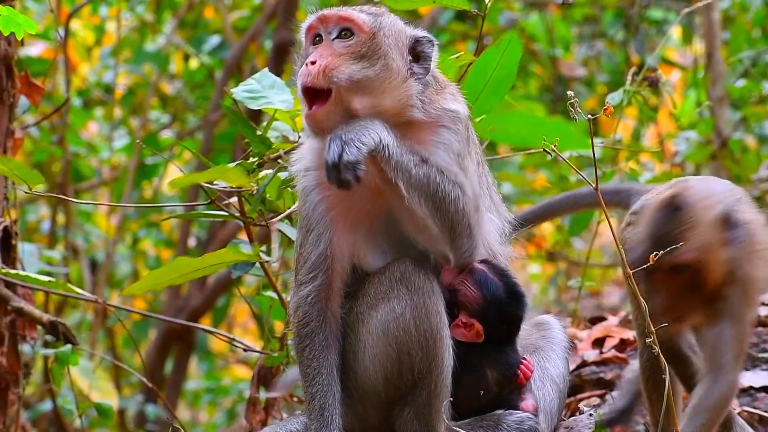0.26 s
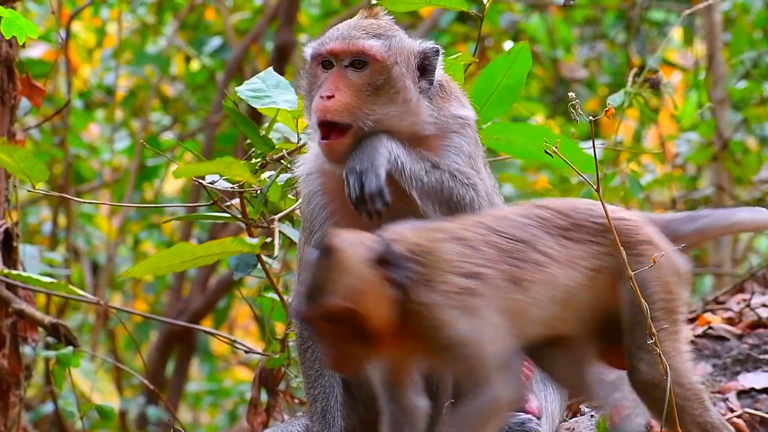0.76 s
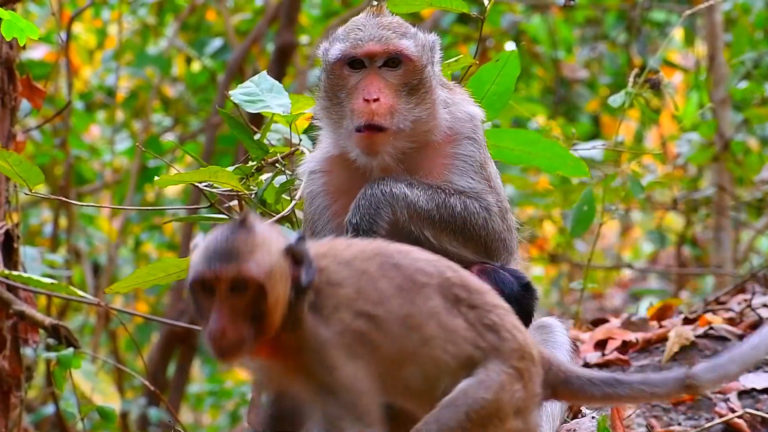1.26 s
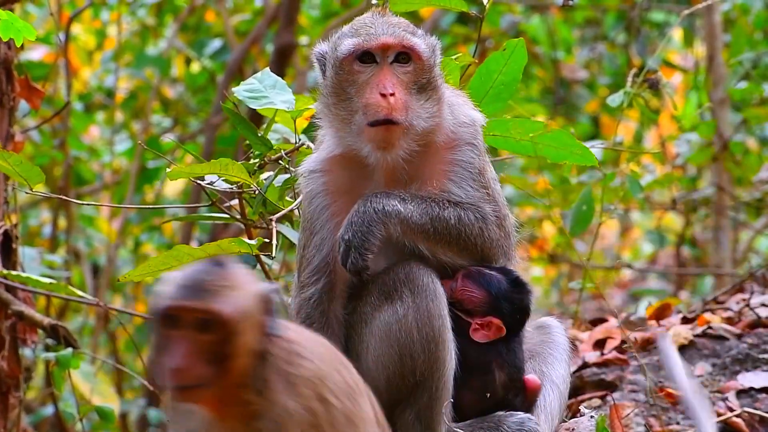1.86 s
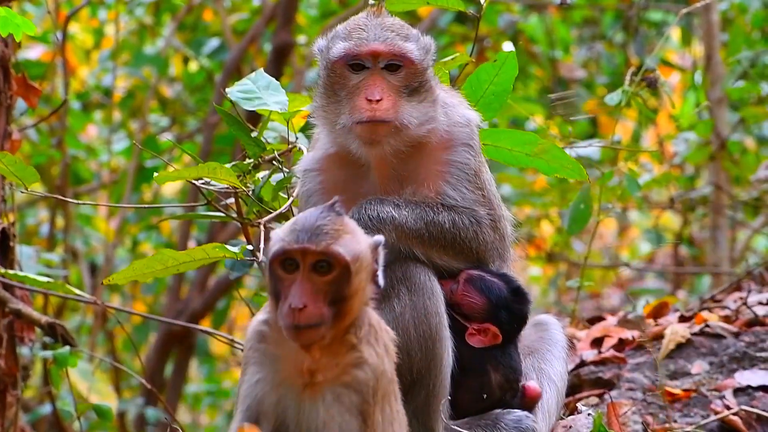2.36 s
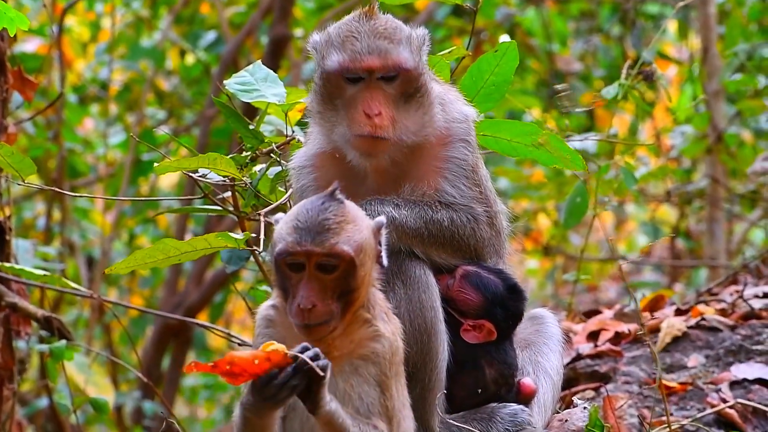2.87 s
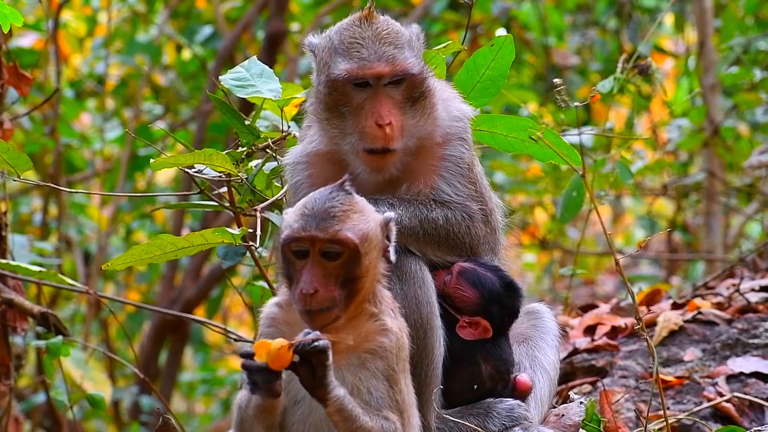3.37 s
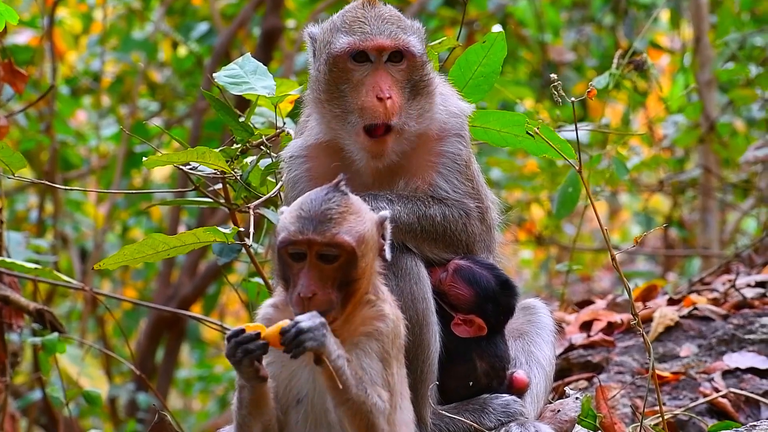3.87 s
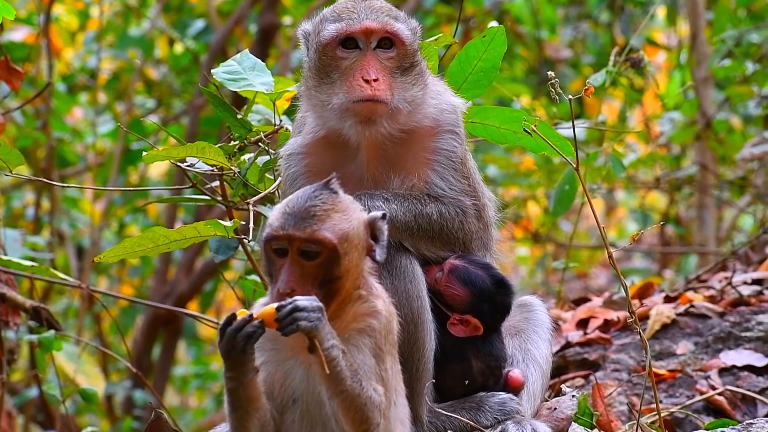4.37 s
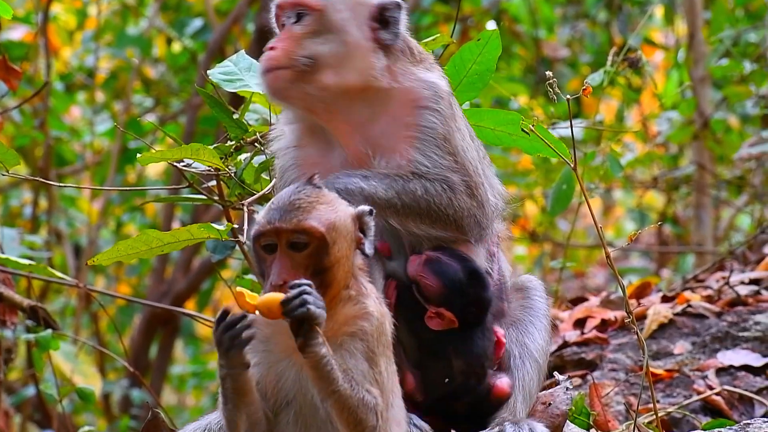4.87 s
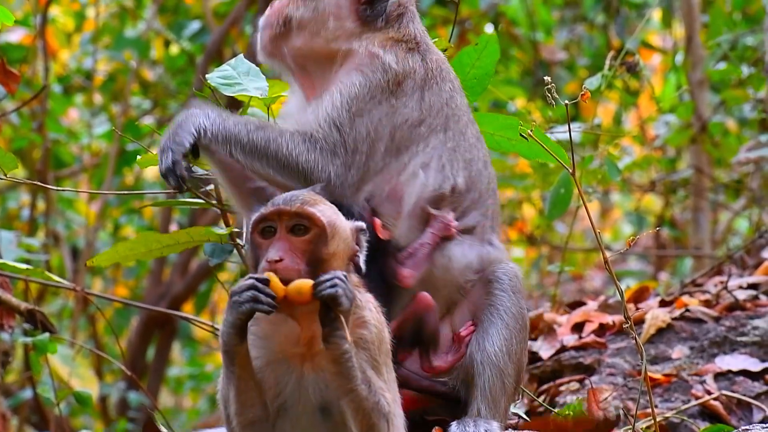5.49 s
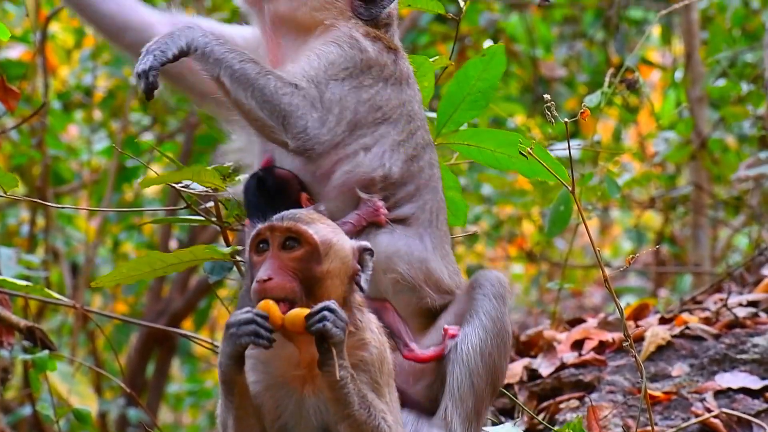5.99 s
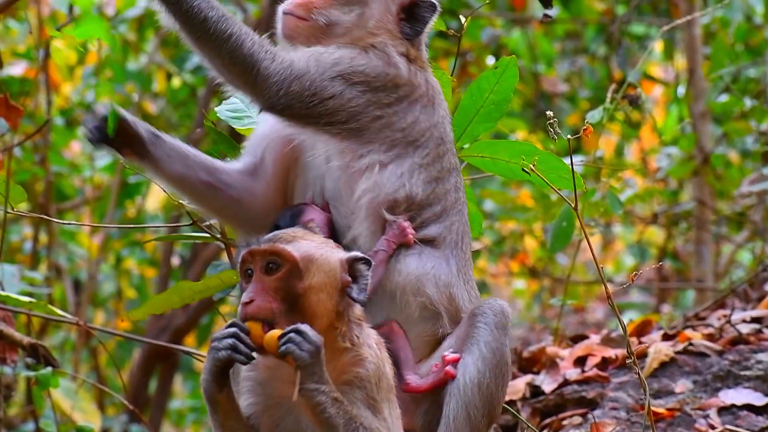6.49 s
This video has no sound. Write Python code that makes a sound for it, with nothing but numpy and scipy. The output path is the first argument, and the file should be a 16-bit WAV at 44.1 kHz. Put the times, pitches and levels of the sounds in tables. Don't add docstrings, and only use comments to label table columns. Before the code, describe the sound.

Shrill monkey squeals and squeaks with rustling leaf litter, snapping twigs and brief coos, fading to a calm forest hush with sparse ticks.

```python
import sys
import numpy as np
from scipy import signal
from scipy.fft import rfft, irfft, next_fast_len
from scipy.io import wavfile
from scipy.ndimage import map_coordinates

SR = 44100
rng = np.random.default_rng(int(sys.argv[2]) if len(sys.argv) > 2 else 0)


def field_ratio(decibels):
    return 10 ** (np.asarray(decibels, dtype=float) / 20)


def unload_wav(signal):
    wavfile.write(
        sys.argv[1],
        SR,
        np.round(np.clip(np.atleast_2d(signal).T, -1, 1) * 32767).astype(np.int16),
    )


N = 297189


def unit(x):
    return x / np.sqrt(np.mean(np.abs(x) ** 2) + 1e-20)


def along(points, hz):
    f, v = np.transpose(points)
    return np.interp(np.log(hz + 1), np.log(f + 1), v)


def over_time(points, t):
    return np.interp(t, *np.transpose(points))


def curves(rows):
    s, *columns = np.transpose(rows)
    i = np.arange(max(round(s[0] * SR), 0), min(round(s[-1] * SR), N))
    return i, [np.interp(i / SR, s, column) for column in columns]


def edges(size, fade):
    t = np.arange(size) / SR
    return np.clip(np.minimum(t, t[::-1]) / fade, 0, 1)


def wobble(size, rate):
    knots = rng.standard_normal(int(size * rate / SR) + 4)
    return map_coordinates(knots, [np.arange(size) * rate / SR])


def coloured(x, spectrum):
    m = next_fast_len(len(x) + 8192)
    hz = np.fft.rfftfreq(m, 1 / SR)
    inside = (hz > spectrum[0][0] / 2) & (hz < spectrum[-1][0] * 2)
    shaped = irfft(rfft(x, m) * field_ratio(along(spectrum, hz)) * inside, m)
    return unit(shaped[:len(x)])


def resonance(x, hz, width_hz):
    turn = np.exp(2j * np.pi * np.cumsum(hz) / SR)
    pole = np.exp(-np.pi * width_hz / SR)
    low = signal.lfilter([1], np.poly([pole, pole]), x / turn)
    return unit((low * turn).real)


def voice(calls, lines, rough, waver, blur_hz, fade):
    out = np.zeros(N)
    for rows, share in zip(calls, np.clip(np.broadcast_to(rough, len(calls)), 0, 1)):
        i, (hz, db) = curves(rows)
        hz = hz * (1 + waver * np.sqrt(share) * wobble(len(i), 120))
        for k, line_db in lines:
            flutter = field_ratio(6 * np.sqrt(share) * wobble(len(i), 150))
            clean = np.sqrt(2) * np.sin(2 * np.pi * np.cumsum(k * hz) / SR) * flutter
            blurred = resonance(rng.standard_normal(len(i)), k * hz, blur_hz)
            mixed = np.sqrt(1 - share) * clean + np.sqrt(share) * blurred
            heard = k * hz < SR * .4
            out[i] += heard * field_ratio(db + line_db) * edges(len(i), fade) * mixed
    return out


def notes(rows, rise, rise_db, end_db, tail, droop):
    calls = []
    for (s, length, hz, db), lost in zip(rows, np.broadcast_to(droop, len(rows))):
        calls.append([(s, hz, db - rise_db),
                      (s + rise * length, hz, db),
                      (s + (1 - tail) * length, hz, db - end_db / 2),
                      (s + length, hz * (1 - lost), db - end_db)])
    return calls


def air():
    # (frequency [Hz], level [dB per Hz])
    hush = [(15, -32.5), (30, -12.5), (53, -7), (96, -3.5), (253, -3.5), (539, -4.5), (651, -5.5),
            (829, -7), (1670, -10), (1960, -13.5), (4290, -16.5), (6600, -16.5), (15600, -22.5)]
    # (frequency [Hz], level [dB])
    apart = [(40, -25), (200, -19), (900, -20), (1900, -16), (4000, -11.5), (12000, -9.5)]
    # (time [s], level [dB])
    breeze = [(0, -76), (.5, -80), (1.4, -72), (2.05, -73), (2.42, -73.5), (2.6, -75.5), (4.1, -74.5),
              (4.8, -77.5), (5.57, -88.5), (6.151, -75), (6.3, -82), (6.7, -75.5)]
    # (frequency [Hz], level [dB per Hz])
    rumble_colour = [(25, -19), (40, -1.5), (55, 1.5), (90, -11.5), (150, -9)]
    mid = coloured(rng.standard_normal(N), hush) * field_ratio(0.53 * wobble(N, 4.6))
    side_colour = [(hz, db + along(apart, hz)) for hz, db in hush]
    side = field_ratio(-3.5) * coloured(rng.standard_normal(N), side_colour)
    gusts = field_ratio(over_time(breeze, np.arange(N) / SR))
    rumble_mid = gusts * coloured(rng.standard_normal(N), rumble_colour)
    rumble_side = gusts * coloured(rng.standard_normal(N), rumble_colour)
    rumble = rumble_mid + field_ratio(-21.5) * rumble_side * np.array([[1], [-1]])
    return field_ratio(-70) * np.array([mid + side, mid - side]) + rumble


def trunks(x):
    # (frequency [Hz], time to fall 60 dB [s])
    echo_times = [(500, 0.48), (3000, 0.23), (9000, 0.3), (15000, 0.35)]
    out, step = np.zeros((2, N + SR)), SR // 4
    for a in range(0, N, step):
        hz, t, z = signal.stft(rng.standard_normal((2, SR // 2)), SR, nperseg=256)
        dying = z * field_ratio(-60 * t / along(echo_times, hz)[:, None])
        mid, side = signal.istft(dying, SR, nperseg=256)[1]
        tails = np.array([mid + .015 * side, mid - .015 * side]) / np.linalg.norm(mid)
        wet = signal.fftconvolve(x[None, a:a + step], tails, axes=1)
        late = a + 200
        out[:, late:late + wet.shape[1]] += wet
    return out[:, :N]


def far_bird():
    # (time [s], pitch [Hz], level [dB])
    trill = [
        [(5.54, 4750, -75), (5.59, 5150, -71), (5.63, 5000, -69.5), (5.66, 4550, -70), (5.7, 5150, -68),
         (5.745, 5050, -68.5), (5.76, 5100, -77), (5.86, 5350, -78)],
    ]
    # (time [s], pitch [Hz], level [dB])
    chips = [
        [(4.938, 6480, -69), (4.98, 4670, -82.5)],
        [(5.43, 4870, -83), (5.52, 4900, -79)],
        [(5.66, 4300, -73), (5.705, 5400, -73)],
    ]
    trilled = voice(trill, [(0.99, 0)], 0.72, waver=0.0497, blur_hz=800, fade=.006)
    return trilled + voice(chips, [(0.98, 0.0018)], 0.091, waver=0.03, blur_hz=296, fade=0.0026)


def litter():
    # (loudest time [s], crackle level [dB], scuff level [dB], length [s])
    footfalls = [(0, -75, -69, 0.088), (0.124, -60, -65.5, 0.065), (0.354, -71.5, -68.5, 0.075),
                 (0.52, -42, -61, 0.026), (0.594, -55.5, -55, 0.1), (0.715, -50.5, -59, 0.081),
                 (0.81, -68, -60.5, 0.24), (0.967, -60, -63.5, 0.11), (1.032, -56.5, -49.5, 0.027),
                 (1.124, -49.5, -53, 0.038), (1.232, -58, -59.5, 0.2), (1.348, -58, -57, 0.2),
                 (1.556, -58, -59, 0.043), (1.796, -63.5, -63.5, 0.14), (2.047, -72, -66.5, 0.24),
                 (2.532, -60, -66.5, 0.056), (2.757, -68.5, -68, 0.26), (2.883, -70, -77.5, 0.12),
                 (2.935, -64, -65, 0.026), (3.08, -67.5, -69.5, 0.051), (3.216, -63.5, -67.5, 0.12),
                 (3.458, -81, -70, 0.13), (3.714, -78.5, -78, 0.16), (3.939, -97.5, -74, 0.4),
                 (4.534, -75.5, -76, 0.16), (5.383, -82, -80.5, 0.12), (5.742, -81, -76.5, 0.28),
                 (5.924, -72, -71, 0.097), (6.41, -75.5, -71, 0.21), (6.631, -73, -69.5, 0.11)]
    # (frequency [Hz], level [dB per Hz])
    crackle_colour = [(1500, -22), (2500, -0.5), (4000, -1.5), (5500, -3), (9000, -33.5)]
    scuff_colour = [(60, -30.5), (130, -10), (300, -8), (900, -5), (1800, -6.5), (3000, -15.5)]
    fizz_colour = [(4500, -11), (6800, 1.5), (9000, -7), (13000, -10), (15700, -15.5)]
    fizz_apart_colour = [(4000, -13.5), (8000, -10), (11000, -9), (13000, 2), (15700, 0)]
    # (time [s], level [dB])
    dryness = [(3.3, 0.5), (4.6, 5), (5.9, 4.5)]
    crush_db, rise_share = 11, 0.6
    t = np.arange(N) / SR
    crackle, scuff = np.zeros((2, N))
    for s, db, scuff_db, length in footfalls:
        shape = field_ratio(-crush_db * np.maximum(t - s, (s - t) / rise_share) / length)
        crackle += field_ratio(db) * shape
        scuff += field_ratio(scuff_db) * shape
    fizz = crackle * field_ratio(over_time(dryness, t))
    grains = rng.standard_normal((5, N)) * field_ratio(2.2 * wobble(N, 500) + .8 * wobble(N, 30))
    middle = field_ratio(3.5) * crackle * coloured(grains[0], crackle_colour)
    middle += field_ratio(2.5) * scuff * coloured(grains[1], scuff_colour)
    middle += field_ratio(4.5) * fizz * coloured(grains[2], fizz_colour)
    apart = field_ratio(-21.5) * scuff * coloured(grains[3], scuff_colour)
    apart += field_ratio(-21) * fizz * coloured(grains[4], fizz_apart_colour)
    return np.array([middle + apart, middle - apart])


def snaps():
    # (time [s], peak level [dB], centre [Hz])
    leaf_snaps = [(.879, -35, 4000), (1.023, -28, 2200), (1.42, -32, 11000), (1.715, -44, 7000),
                  (1.742, -55, 5000), (1.79, -37, 6000), (1.822, -36, 7000), (1.991, -35, 4060),
                  (2.276, -52, 8800), (2.295, -52, 7000), (2.429, -47, 4560), (2.61, -48, 3000),
                  (2.74, -44, 12500), (3.036, -46, 7000), (3.298, -45, 6900), (4.056, -51.5, 1190),
                  (4.535, -56, 8000), (5.752, -60, 3500)]
    t60_s, width = .016, 1.1
    out, t = np.zeros(N + SR), np.arange(SR // 20) / SR
    for s, db, hz in leaf_snaps:
        click = resonance(rng.standard_normal(len(t)), np.full(len(t), hz), width * hz)
        shape = field_ratio(db - 7 - 60 * t / t60_s) * (1 - np.exp(-t / .0008))
        out[round(s * SR):][:len(t)] += shape * click
    return out[:N]


def ticks():
    # (time [s], peak level [dB], centre [Hz])
    twig_ticks = [(.117, -36, 2480), (1.009, -38, 294), (1.023, -27, 1770), (1.299, -26.5, 2970),
                  (1.374, -30, 4660), (1.405, -29, 5530), (1.742, -39, 3560), (1.788, -32.5, 3130),
                  (1.823, -35, 5230), (2.014, -46, 330), (2.03, -46, 548), (2.088, -38.5, 3280),
                  (2.119, -36.5, 4500), (2.128, -32, 2550), (2.237, -45, 3830), (2.712, -31.5, 6670),
                  (2.935, -36, 3100), (4.267, -52, 877), (4.53, -45.5, 2150), (4.5, -57, 602),
                  (4.625, -46, 6860), (4.66, -53, 520), (4.72, -52.5, 384), (4.745, -52.5, 5600),
                  (5.399, -58.5, 141.4), (5.663, -57.5, 775), (5.882, -44, 8700), (5.914, -46.5, 524),
                  (5.93, -46, 1600), (6.066, -49, 427), (6.184, -55, 386), (6.211, -57.5, 405),
                  (6.238, -59.5, 272), (6.402, -41.5, 800), (6.444, -46, 8000), (6.617, -48, 580),
                  (6.732, -44.5, 1470)]
    out, t = np.zeros(N + SR), np.arange(SR // 10) / SR
    for s, db, hz in twig_ticks:
        noise = rng.standard_normal((2, len(t)))
        ring = resonance(noise[0], np.full(len(t), hz), 0.5 * hz) * field_ratio(-60 * t / (0.031 + 22 / hz))
        crack = 0.6 * noise[1] * field_ratio(-60 * t / .014) * min(hz / 4000, 1)
        onset = 1 - np.exp(-t / 0.0016)
        out[round(s * SR):][:len(t)] += field_ratio(db - 9.5) * (ring + crack) * onset
    return out[:N]


def coos():
    # (time [s], length [s], pitch [Hz], level [dB])
    short_coos = [
        (.32, 0.071, 880, -68),
        (1.285, 0.076, 879, -54),
        (1.66, 0.038, 850, -67),
        (1.925, 0.038, 874, -57.5),
    ]
    coo_droop = [.01, .01, .04, .01]
    # (time [s], pitch [Hz], level [dB])
    long_coos = [
        [(1.475, 880, -62), (1.509, 878, -52), (1.543, 872, -54), (1.555, 897, -67), (1.595, 876, -52),
         (1.611, 784, -56), (1.625, 730, -80)],
        [(1.76, 867, -62), (1.772, 843, -55), (1.85, 880, -50.5), (1.866, 855, -49), (1.876, 823.8, -53.5),
         (1.882, 884, -66), (1.89, 867.4, -62)],
    ]
    far_coos = [
        [(4.84, 820, -77), (4.97, 830, -83), (5.12, 920, -76)],
        [(4.89, 1090, -75), (4.95, 1110, -77)],
        [(5.24, 860, -79), (5.31, 780, -78)],
        [(5.43, 880, -77), (5.48, 900, -77)],
    ]
    low_hum = [
        [(2.01, 164, -75), (2.042, 162, -54.5), (2.085, 156.7, -62.5), (2.13, 156, -69)],
    ]
    bark = [
        [(2.124, 605, -51), (2.133, 588, -56), (2.146, 586, -57)],
    ]
    # (multiple of the pitch, level [dB])
    bark_lines = [(2, -7), (3, -6), (4, -3), (5, 4)]
    short = notes(short_coos, rise=.3, rise_db=3.5, end_db=4.0, tail=.45, droop=coo_droop)
    hoots = list(short) + list(long_coos) + list(far_coos)
    out = voice(hoots, [(1, 0)], .05, waver=.02, blur_hz=60, fade=.012)
    hum_lines = [(1, 1.5), (2, -8.5), (3, -24), (4, -28)]
    out += voice(low_hum, hum_lines, 0.21, waver=.03, blur_hz=89.5, fade=0.0092)
    return out + voice(bark, bark_lines, .25, waver=.03, blur_hz=200, fade=.003)


def grunts():
    # (time [s], length [s], pitch [Hz], level [dB])
    huffs = [
        (4.054, .06, 262, -67.5),
        (4.114, .035, 268, -70),
        (6.375, .06, 277, -63),
        (6.437, .02, 262, -67),
        (6.478, .024, 262, -68),
    ]
    # (multiple of the pitch, level [dB])
    open_lines = [(1, -5.5), (2, -15.5), (3, 3.5), (4, 3), (5, -5), (6, -2.5)]
    muffled_lines = [(1, -16), (2, 0), (3, -2), (4, -11), (6, -11)]
    breaths = notes(huffs, rise=0.11, rise_db=9, end_db=4, tail=0.5, droop=-0.032)
    opened = voice(breaths[:2], open_lines, .35, waver=.02, blur_hz=90, fade=.004)
    return opened + voice(breaths[2:], muffled_lines, .45, waver=.03, blur_hz=150, fade=.004)


def peep():
    # (time [s], pitch [Hz], level [dB])
    body = [
        [(3.353, 1392, -51), (3.36, 1380, -49), (3.372, 1355, -61), (3.385, 1295, -61), (3.42, 1340, -62.5),
         (3.5, 1360, -80)],
    ]
    overtones = [
        [(3.352, 1378, -61), (3.365, 1350, -60), (3.38, 1290, -63), (3.395, 1253, -55), (3.41, 1270, -58),
         (3.44, 1290, -72)],
    ]
    upper = [
        [(3.353, 1375, -56), (3.37, 1334, -63), (3.395, 1335, -60), (3.42, 1300, -63), (3.445, 1300, -74)],
    ]
    # (multiple of the pitch, level [dB])
    upper_lines = [(4, -7), (5, -11), (6, -9), (7, -8)]
    # (time [s], frequency [Hz], level [dB])
    strands = [
        [(3.445, 5500, -71), (3.478, 4750, -67)],
        [(3.485, 1500, -72), (3.503, 1500, -68)],
        [(3.44, 6700, -73), (3.49, 6500, -73)],
    ]
    out = voice(body, [(1, -16), (2, 0)], .2, waver=.015, blur_hz=300, fade=.002)
    out += voice(overtones, [(3, -3)], .5, waver=.02, blur_hz=400, fade=.003)
    out += voice(upper, upper_lines, .55, waver=.02, blur_hz=500, fade=.003)
    return out + voice(strands, [(1, 0)], .3, waver=.02, blur_hz=400, fade=.004)


def squeaks():
    # (time [s], length [s], strongest line [Hz], level [dB])
    bursts = [
        (3.03, 0.052, 6900, -51),
        (3.082, 0.048, 7790, -46.5),
        (3.14, 0.083, 7760, -55),
        (3.222, 0.044, 6870, -48.5),
    ]
    # (multiple of the strongest line, level [dB])
    squeak_lines = [(1, 0), (4 / 3, -19), (5 / 3, -21), (6 / 3, -16)]
    calls = notes(bursts, rise=0.47, rise_db=5.0, end_db=5.5, tail=0.37, droop=.005)
    return voice(calls, squeak_lines, [.6, .25, .6, .35], waver=.012, blur_hz=500, fade=.004)


def whistles():
    # (time [s], strongest line [Hz])
    glides = [
        [(.634, 12300), (.645, 12800), (.69, 12890), (.705, 11930), (.72, 10700), (.732, 9900)],
        [(.805, 10820), (.82, 12400), (.85, 12380), (.88, 12150), (.9, 11000), (.925, 10330)],
        [(1.14, 11300), (1.16, 12700), (1.192, 11200), (1.197, 12430), (1.22, 11340), (1.24, 10690),
         (1.28, 10260), (1.3, 9570), (1.315, 10380)],
        [(1.335, 11000), (1.345, 10910), (1.385, 10900), (1.402, 10250), (1.44, 10350), (1.448, 9750),
         (1.484, 9950), (1.51, 8000), (1.53, 7350)],
        [(1.862, 6570), (1.88, 8650), (1.92, 10520), (1.97, 11510), (2.0, 10770), (2.02, 9300), (2.065, 8150),
         (2.082, 7160), (2.1, 8120)],
        [(2.272, 8150), (2.31, 10000), (2.34, 11000), (2.36, 11600), (2.42, 11600), (2.452, 10200),
         (2.472, 8100)],
        [(2.508, 7300), (2.525, 7450), (2.535, 8100), (2.556, 8400), (2.572, 9300), (2.61, 9650), (2.655, 9700),
         (2.678, 8500), (2.7, 6500)],
    ]
    # (level [dB], loss at the top of the arch [dB], loss by the end [dB])
    breath = [(-34, -2, 4), (-49, -12, 1), (-39, -2, 5), (-47, 1, 1), (-56, -9, -6), (-54, 7, 7),
              (-49, 8, 6)]
    roughness = [.45, .5, .36, .65, .4, .04, .1]
    # (multiple of the strongest line, level [dB])
    whistle_lines = [(1, 0), (3 / 2, -25)]
    calls = []
    for rows, (db, top_db, end_db) in zip(glides, breath):
        s, hz = np.transpose(rows)
        height = (hz - hz.min()) / np.ptp(hz)
        spent = (s - s[0]) / np.ptp(s)
        calls.append(np.transpose([s, hz, db - top_db * height ** 2 - end_db * spent]))
    return field_ratio(-2.5) * voice(calls, whistle_lines, roughness, waver=.015, blur_hz=1000, fade=.002)


def hoarse_tones():
    # (time [s], pitch [Hz], level [dB])
    shrill = [
        [(.55, 7100, -36), (.57, 6950, -28), (.612, 6680, -32), (.625, 6600, -46)],
        [(.745, 6950, -42), (.765, 6800, -40), (.78, 6700, -50)],
        [(1.863, 6600, -60), (1.92, 6700, -70)],
        [(2.04, 8600, -54), (2.07, 8050, -50), (2.14, 8100, -60)],
        [(2.478, 9000, -58), (2.53, 8900, -59)],
        [(3.1, 7150, -56), (3.125, 7100, -57)],
        [(3.27, 6800, -62), (3.33, 6700, -72)],
        [(4.67, 6800, -74), (4.74, 6600, -76)],
    ]
    rasp = [
        [(.494, 2400, -44), (.505, 2430, -31), (.517, 2560, -39), (.54, 2700, -43)],
        [(.903, 2400, -47), (.935, 2300, -60)],
        [(1.107, 2450, -46), (1.135, 2450, -52)],
    ]
    undertone = [
        [(1.23, 5450, -59), (1.49, 5400, -65)],
        [(3.038, 4800, -62), (3.07, 4850, -66)],
        [(3.075, 5100, -65), (3.13, 5350, -63), (3.17, 5600, -64), (3.21, 5300, -60), (3.26, 5300, -66)],
        [(3.2, 4800, -66), (3.235, 4850, -62), (3.27, 4900, -68), (3.335, 5000, -72)],
    ]
    stray = [
        [(.51, 5500, -33.5), (.537, 5500, -37.5)],
        [(.565, 6000, -34), (.59, 6000, -37)],
        [(1.852, 4170, -64), (1.875, 4460, -58)],
        [(1.885, 13700, -68), (1.92, 13900, -69)],
        [(2.01, 15100, -65), (2.045, 15000, -62)],
        [(2.32, 5400, -89), (2.4, 5400, -85)],
        [(2.51, 4200, -65), (2.56, 4240, -76)],
    ]
    out = voice(shrill, [(1, 0)], .55, waver=.02, blur_hz=500, fade=.004)
    out += voice(rasp, [(1, 0), (2, -14)], .5, waver=.03, blur_hz=500, fade=.003)
    out += voice(undertone, [(1, 0)], [.9, .5, .7, .55], waver=.02, blur_hz=500, fade=.008)
    return out + voice(stray, [(1, 0)], .7, waver=.03, blur_hz=700, fade=.005)


def screech():
    # (start time [s], length [s], mouth level [dB], mouth resonance [Hz], throat against mouth [dB])
    bursts = [(0.467, 0.046, -31.5, 7800, -33), (0.494, 0.035, -24.5, 7370, -6.5),
              (0.544, 0.0222, -19, 7160, -5), (0.56, 0.022, -20.5, 6900, -4.5),
              (0.59, 0.045, -25, 7560, -14.5), (0.739, 0.036, -32.5, 7500, -7.5),
              (0.787, 0.032, -32, 8350, -11), (0.89, 0.05, -40.5, 8200, -14),
              (0.924, 0.024, -40, 7140, -12), (1.103, 0.029, -33, 7150, -1),
              (1.15, 0.041, -46.5, 7400, -14), (1.489, 0.031, -43, 8700, -13),
              (2.019, 0.032, -41, 7140, -5), (2.07, 0.035, -57.5, 7760, 3),
              (2.466, 0.041, -53.5, 8200, -19), (2.512, 0.044, -49, 7900, -6),
              (2.692, 0.013, -47, 6840, -10), (2.75, 0.0213, -56, 6700, -3), (3.028, 0.03, -48.5, 7100, -8),
              (3.091, 0.051, -50.5, 7500, -31), (3.143, 0.077, -51, 7300, -21),
              (0.613, 0.017, -26, 11300, -16), (2.02, 0.023, -46, 10240, -31),
              (3.03, 0.0364, -54, 12900, -30), (0.731, 0.013, -33, 11200, -28),
              (1.12, 0.027, -34, 11100, -24), (1.37, 0.034, -48, 11900, -33),
              (1.312, 0.051, -48, 9100, -26), (1.325, .025, -50.5, 12000, -30),
              (1.42, .05, -53.5, 11100, -39), (1.86, 0.037, -52.5, 8200, -34),
              (3.098, .015, -54.5, 9700, -30), (3.235, .03, -61, 13800, -30)]
    # (time [s], frequency [Hz])
    throat_path = [(.505, 2564), (.543, 2680), (.548, 3030), (.6, 3080), (.64, 2580), (.9, 2320),
                   (1.12, 2514), (2.0, 2900), (2.8, 3030), (3.04, 2380)]
    # (frequency [Hz], level [dB per Hz])
    hiss_colour = [(7000, -21), (9500, 3), (12500, -2), (14000, -2), (15700, -9)]
    attack_s, attack_db = 0.016, 16
    sag, release, throat_sag = 59.5, 500, 196.5
    hiss_start_db, hiss_growth, hiss_per_effort = -21, 145.5, 0.096
    out = np.zeros(N)
    t = np.arange(SR // 4) / SR
    for s, length, db, hz, throat_re_db in bursts:
        i = round(s * SR) + np.arange(len(t))
        attack = attack_db * np.clip(1 - t / attack_s, 0, 1)
        mouth_db = db - attack - sag * t - release * np.maximum(t - length, 0)
        throat_db = mouth_db + throat_re_db - throat_sag * t
        hiss_db = mouth_db + hiss_start_db + hiss_growth * np.minimum(t, length) + hiss_per_effort * (db + 40.5)
        mouth_hz = hz * (1 + .03 * wobble(len(t), 50))
        throat_hz = over_time(throat_path, i / SR)
        puffs = rng.standard_normal((3, len(i))) * field_ratio(1.3 * wobble(len(i), 700))
        mouth_ring = 0.54 * resonance(puffs[0], mouth_hz, 1300) + 0.74 * resonance(puffs[2], mouth_hz, 2987)
        throat_ring = resonance(resonance(puffs[1], throat_hz, 670), throat_hz, 700)
        hiss = field_ratio(hiss_db + 7.5) * coloured(puffs[2], hiss_colour)
        burst = field_ratio(mouth_db) * mouth_ring + field_ratio(throat_db) * throat_ring + hiss
        out[i] += field_ratio(-1.5) * edges(len(i), .003) * burst
    return out


def youngster():
    return screech() + whistles() + squeaks() + hoarse_tones() + peep()


def scene():
    # (time [s], level [dB])
    turning = [(.64, -13), (.7, -6), (1.0, -8), (1.18, -7), (1.28, -2), (1.5, 0), (1.8, -2), (1.86, 6),
               (1.93, 2), (2.0, -3), (2.25, 3), (2.75, 2), (3.0, -7), (3.3, -7), (3.36, -12)]
    calls, near_coos, near_grunts = youngster(), coos(), grunts()
    ground = ticks() + snaps() + litter()
    bird = far_bird()
    to_trunks = field_ratio(over_time(turning, np.arange(N) / SR)) * calls
    to_trunks += field_ratio(-14) * (near_coos + near_grunts)
    to_trunks += field_ratio(-9) * ground.mean(axis=0) + field_ratio(-3) * bird
    grunts_right = near_grunts * field_ratio(np.array([[-1.2], [1.2]]))
    return calls + near_coos + grunts_right + ground + field_ratio(-0.5) * bird + trunks(to_trunks) + air()


def low_pass(x):
    return signal.sosfilt(signal.butter(12, 15770, fs=SR, output="sos"), x)


def record(dry):
    below_limit = np.fft.rfftfreq(N, 1 / SR) < 15760
    narrow = irfft(rfft(dry) * below_limit, N)
    return low_pass(narrow)


dry = scene()
out = record(dry)
unload_wav(out)
```